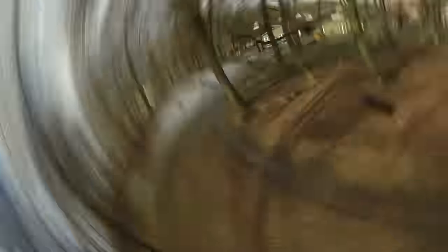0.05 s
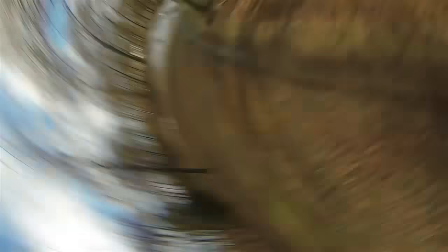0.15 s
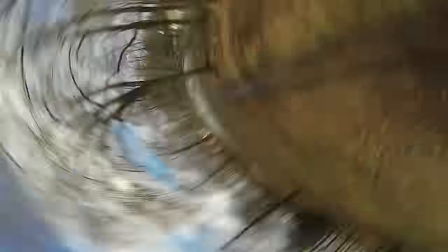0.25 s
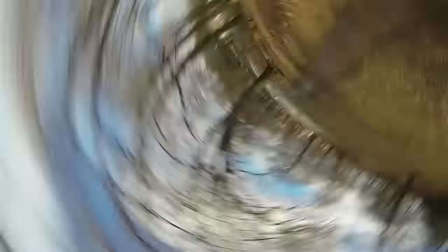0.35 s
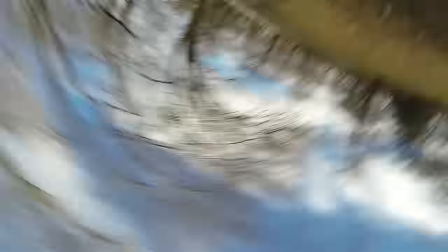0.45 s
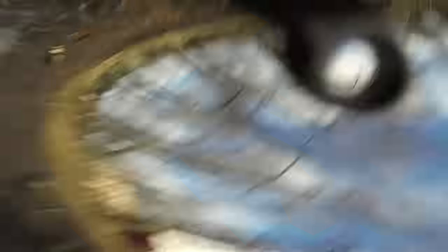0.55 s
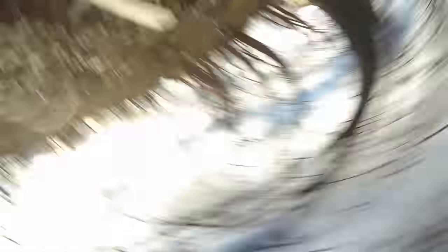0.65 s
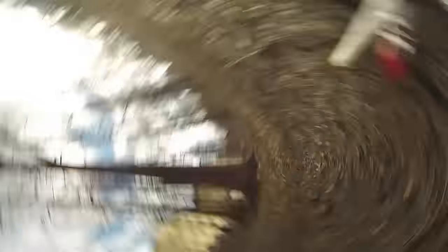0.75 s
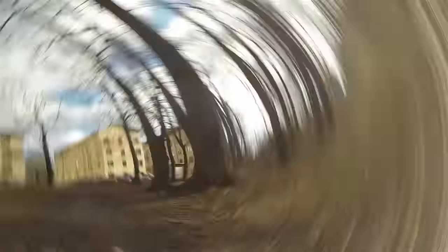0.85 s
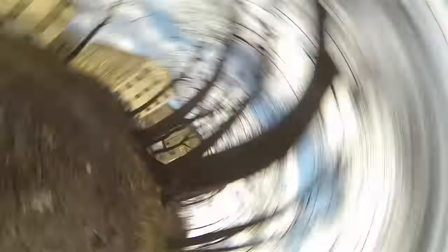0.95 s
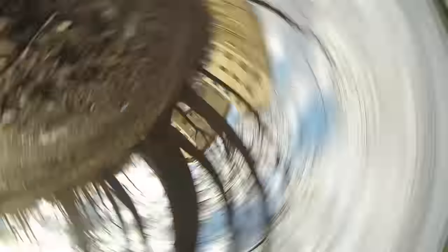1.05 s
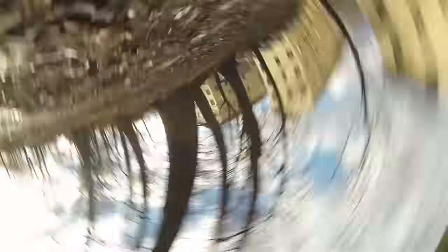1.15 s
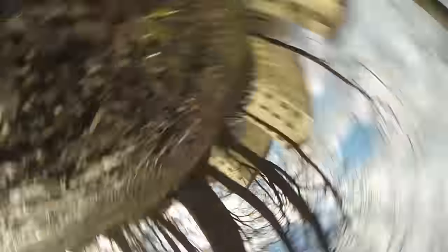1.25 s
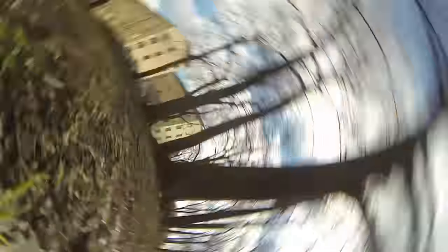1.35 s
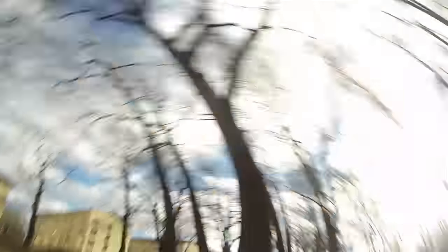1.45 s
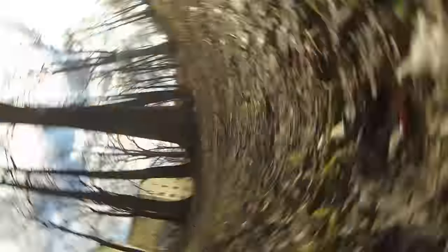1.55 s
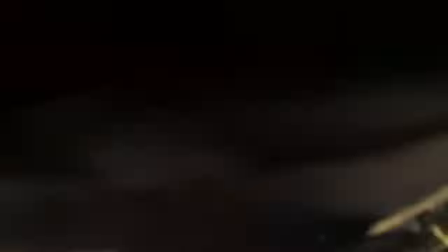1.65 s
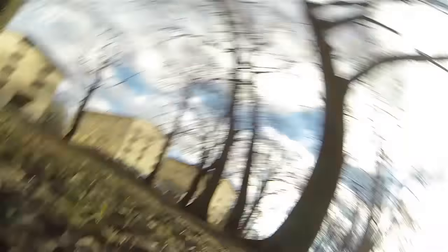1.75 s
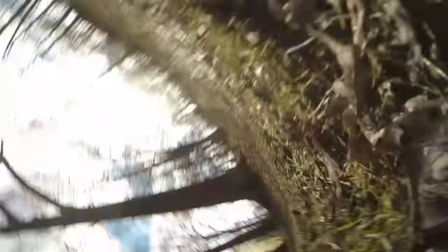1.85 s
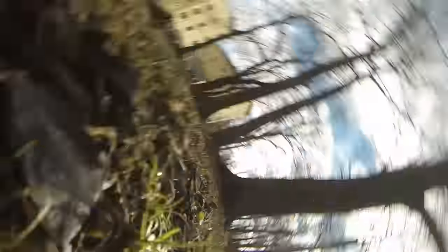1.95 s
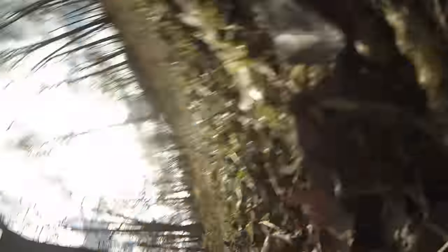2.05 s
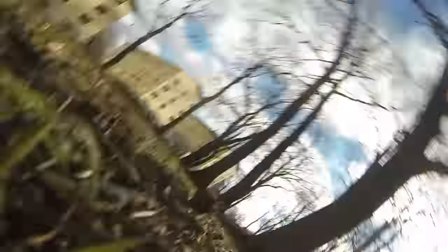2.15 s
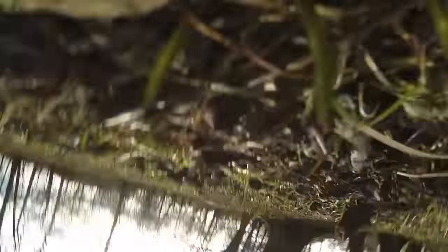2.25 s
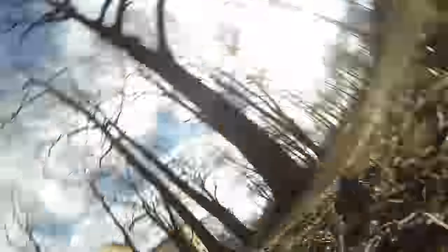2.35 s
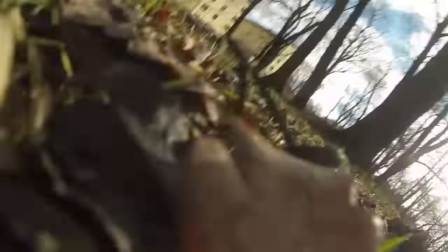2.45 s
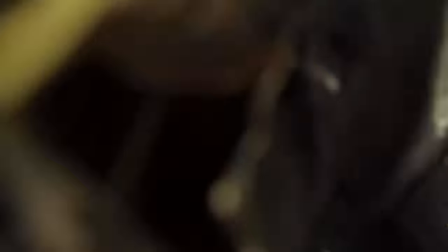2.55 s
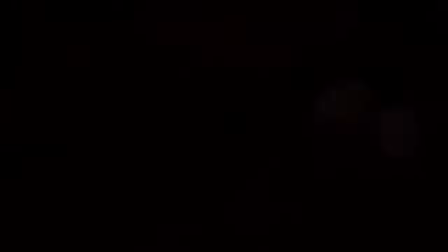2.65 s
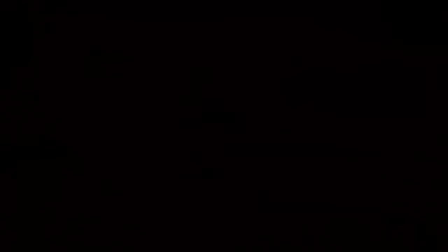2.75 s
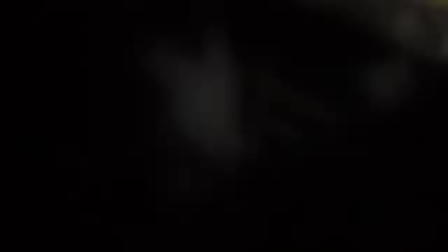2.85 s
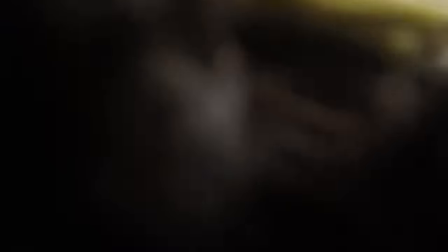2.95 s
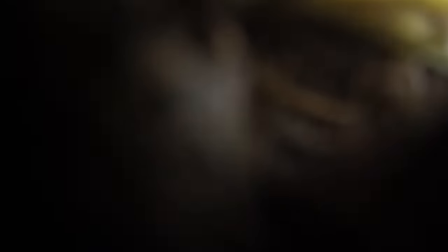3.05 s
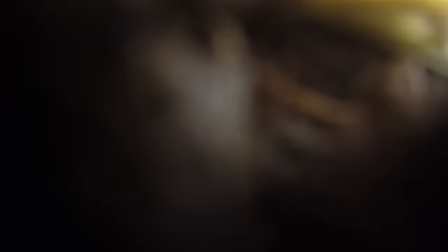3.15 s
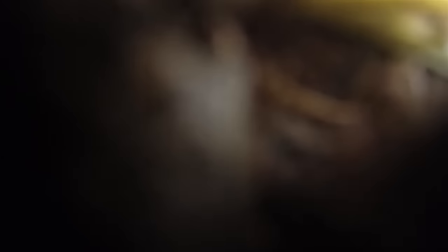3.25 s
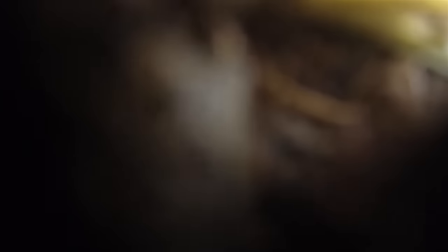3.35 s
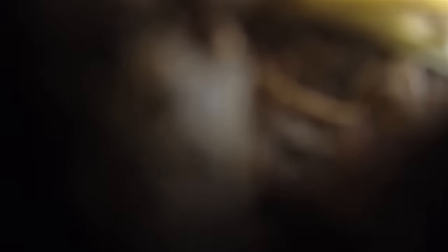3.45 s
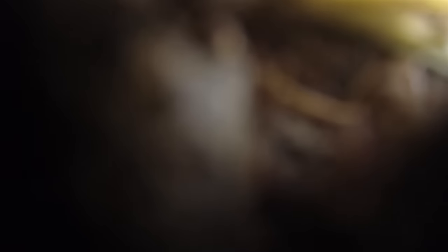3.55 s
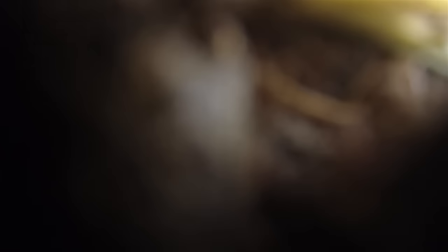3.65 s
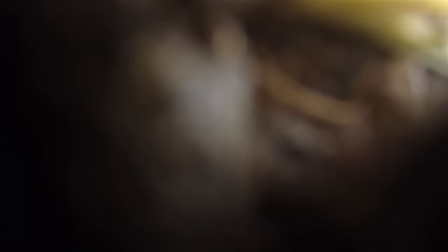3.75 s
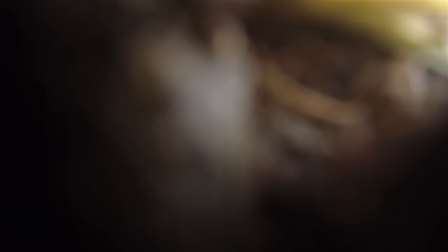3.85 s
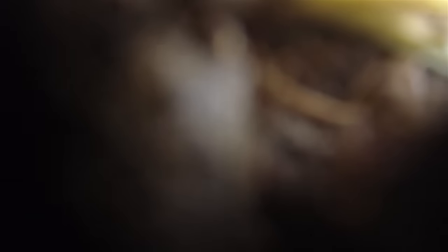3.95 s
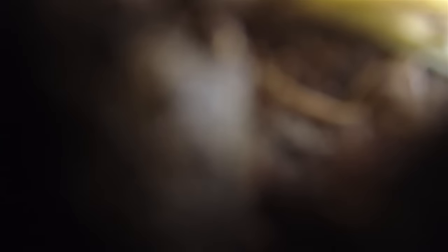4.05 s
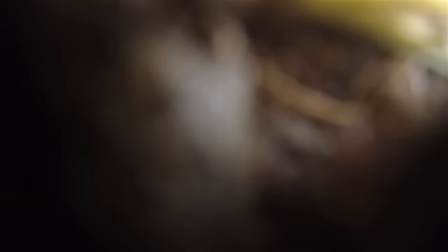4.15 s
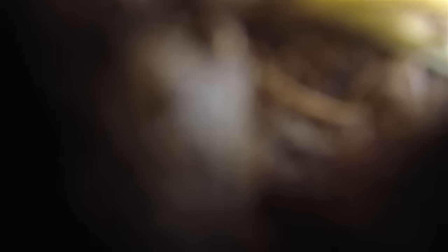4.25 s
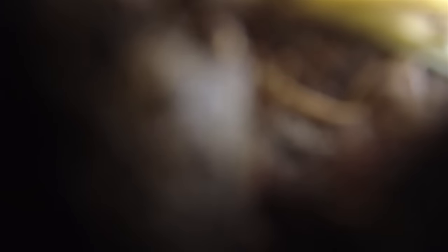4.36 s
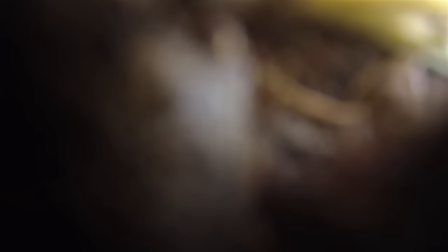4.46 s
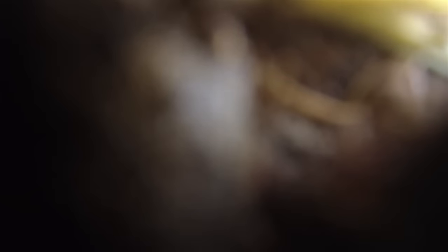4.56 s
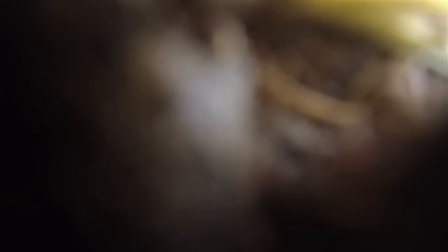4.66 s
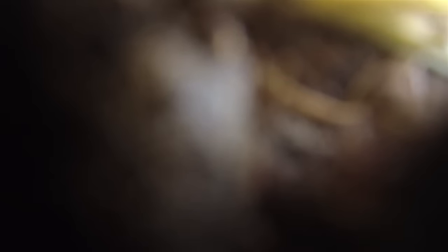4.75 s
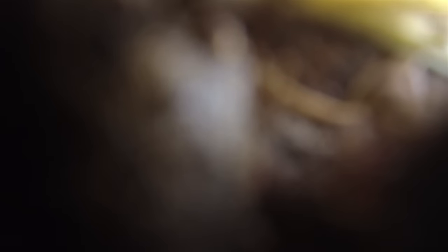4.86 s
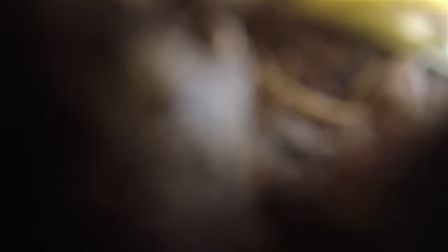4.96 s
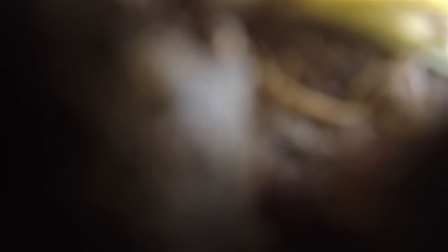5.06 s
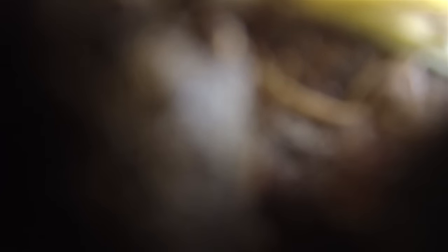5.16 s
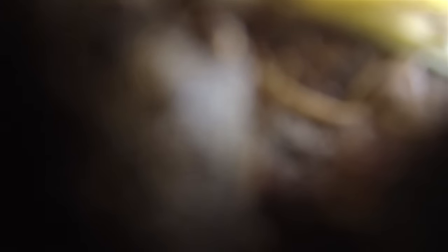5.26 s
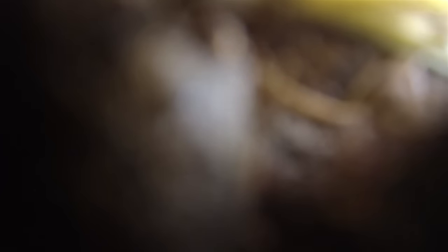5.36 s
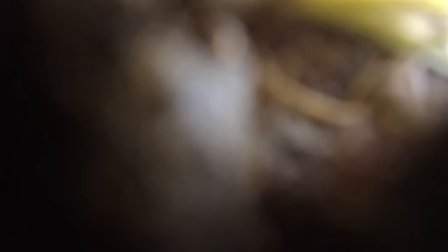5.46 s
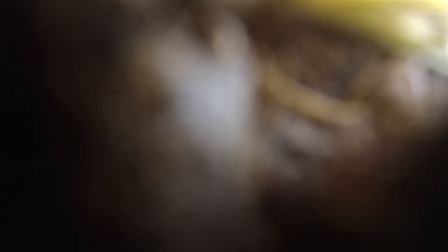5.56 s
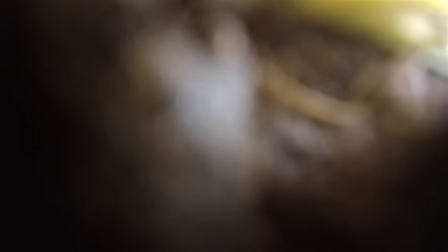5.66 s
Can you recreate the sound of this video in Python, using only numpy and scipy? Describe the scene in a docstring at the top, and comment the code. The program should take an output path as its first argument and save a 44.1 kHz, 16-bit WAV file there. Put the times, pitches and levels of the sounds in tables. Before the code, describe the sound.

Rapid whooshing wind blasts, then hard plastic clacks and cracks as a small drone tumbles through branches and lands, leaving faint traffic and birds.

```python
"""A small camera drone, motors stopped, falls through branches, heard from its own microphone.
First it spins fast: each turn brings a blast of air and its wake, made of filtered noise. A branch stops it.
Then it tumbles: short ringing blows, quickening rattles, dull gusts, and twigs that scrape in tiny clicks.
Once the loud blows end, distant traffic, made of noise and hums, becomes audible; then two birds whistle
in the trees, one high and one lower. A thin electronic whine runs throughout."""
import sys
import numpy as np
from scipy import signal
from scipy.fft import rfft, irfft
from scipy.io import wavfile
from scipy.ndimage import uniform_filter1d

SR = 44100
rng = np.random.default_rng(int(sys.argv[2]) if len(sys.argv) > 2 else 0)


def master_out(mix):
    """Clip the mix to full scale and print it as 16-bit PCM to the path in sys.argv[1]."""
    frames = np.transpose(np.atleast_2d(mix))
    ceiling = np.clip(frames, -1, 1)
    pcm = np.round(ceiling * 32767).astype(np.int16)
    wavfile.write(sys.argv[1], SR, pcm)


N = 251370
TIME = np.arange(N) / SR  # s
TOP_HZ = 15600  # upper limit of the microphone sound
CAUGHT_S = 0.588  # a branch stops the fast spin
LANDED_S, GROUND_CLACK_DB = 1.9, 2  # on the ground the frame clacks more than against branches
REST_S, SETTLE_DB_PER_S = 3.7, 4.5  # once the drone lies still, air and debris die away


def undb(db):
    """Turn decibels into a gain."""
    return 10 ** (np.asarray(db) / 20)


def level(x, db, seconds=None):
    """Scale to an rms level, as if all the energy lay within the given time."""
    count = len(x) if seconds is None else seconds * SR
    rms = np.sqrt(np.sum(x ** 2) / count + 1e-30)
    return x * undb(db) / rms


def curve(rows):
    """Join (time [s], value) rows by straight lines."""
    return np.interp(TIME, *np.transpose(rows))


def add(out, x, start):
    """Mix x into out from a time in seconds."""
    i = int(round(start * SR))
    first, last = max(i, 0), min(i + len(x), len(out))
    out[first:last] += x[first - i:last - i]


def centred(x, middle):
    """Make a full-length track that holds x with its middle at a time in seconds."""
    out = np.zeros(N)
    add(out, x, middle - len(x) / SR / 2)
    return out


def colour(x, points):
    """Filter by a spectrum of (frequency [Hz], level [dB]) points."""
    hz, db = np.transpose(points)
    f = np.maximum(np.fft.rfftfreq(len(x), 1 / SR), 1)
    gain = undb(np.interp(np.log(f), np.log(hz), db))
    return irfft(rfft(x) * gain, len(x))


def band(x, lo_hz, hi_hz, order=3):
    """Keep one band of frequencies."""
    sos = signal.butter(order, [lo_hz, min(hi_hz, .45 * SR)], "band", fs=SR, output="sos")
    return signal.sosfilt(sos, x)


def walk(rate):
    """Drift smoothly at random, with about so many new values a second."""
    k = int(SR / rate)
    steps = np.repeat(rng.standard_normal(N // k + 1), k)
    return uniform_filter1d(steps, k)[:N]


def grains(count, spread_db, rate, largest=4):
    """Scatter random clicks, about so many a second; a positive spread makes a few much larger."""
    size = undb(spread_db * np.minimum(rng.exponential(size=count), largest))
    happens = rng.random(count) < rate / SR
    return rng.standard_normal(count) * size * happens


def ring(modes, t, scatter, scatter_db):
    """Sum dying tones; where the blow lands shifts the pitch and strength of each."""
    out = np.zeros(len(t))
    for hz, t60, db in modes:
        strength, shift = rng.standard_normal(2)
        fade = np.exp(-np.log(1000) * t / t60)
        tone = np.sin(2 * np.pi * hz * (1 + scatter * shift) * t)
        out += undb(db + scatter_db * strength) * fade * tone
    return out


# blows on the frame: (time [s], pitch of the housing [Hz], knock level [dB], hardness [dB])
BLOWS = [(0.6184, 860, -29, 5.5), (0.6336, 696, -27, 2.5), (0.7582, 744, -14.5, 2),
         (0.7755, 930, -33.5, 10), (.809, 762, -14.5, -2), (1.074, 550, -47, 16.5),
         (1.118, 1060, -27.5, -5), (1.1418, 937, -19.5, 6.5), (1.3262, 950, -42.5, 10),
         (1.4504, 550, -34, -6), (1.6289, 890, -14, -7.5), (1.6821, 752, -14.5, -2.5),
         (1.6994, 590, -29.5, 2), (1.7404, 860, -18, 5), (1.826, 777, -16.5, 4.5), (1.957, 780, -17, 0.5),
         (2.0508, 740, -26.5, -1), (2.079, 702, -24.5, 0), (2.2089, 723, -17, 0.5),
         (2.3527, 768, -16.5, 7.5), (2.445, 793, -17, -0.5), (2.5423, 693, -16.5, -3.5),
         (2.7224, 775, -17.5, 1.5), (2.835, 836, -24, -3.5), (2.9138, 595, -49.5, 6),
         (3.045, 860, -43.5, 6), (3.223, 722, -53.5, -4), (3.3775, 780, -53.5, -1),
         (3.4797, 640, -53.5, 12), (3.537, 603, -54.5, 2), (4.0202, 905, -44.5, -9), (4.3496, 640, -61, 7)]


def blows():
    """The frame strikes branches and ground, then shifts a few times where it lies."""
    out = np.zeros(N)
    for start, hz, knock_db, hardness_db in BLOWS:
        add(out, blow(hz, knock_db, hardness_db, start > LANDED_S), start)
    return out


# the heavily damped camera housing: (multiple of its pitch [x], time to fade by 60 dB [s], level [dB])
HOUSING = [(1, 0.021, -5), (1.2, 0.018, -5.5), (2.42, 0.0039, -11), (3.3, 0.0089, -21), (3.6, 0.0027, -30),
           (6.75, 0.0042, -11), (9.7, 0.0067, -16.5), (13.5, .003, -10), (16.3, .0025, -12.5)]
# the arms and propellers ring on: (frequency [Hz], time to fade by 60 dB [s], level [dB])
FRAME = [(286, 0.1, -30), (505, 0.27, -40), (863, 0.059, -19), (1050, 0.088, -35), (1210, 0.089, -30),
         (1333, 0.11, -31.5), (2050, 0.018, -26), (2400, 0.032, -33.5)]
# colour of splintering wood, also of ticking debris: (frequency [Hz], level [dB])
SPLINTER = [(250, 4), (800, 9.5), (2700, -7), (3500, -3), (4000, 4), (5200, -7.5), (6500, -4), (7700, -3),
            (10800, -8.5), (12800, -17.5), (14000, -16), (15500, -19.5)]
# clack and snap relative to the knock; hardness adds fully to the snap and partly to the clack
CLACK_DB, SNAP_DB, CLACK_SHARE = -6.5, -15, 0.36


def blow(hz, knock_db, hardness_db, on_ground, contact_s=0.0015, splinter_db=-6, after_db=-21,
         after_s=0.0077, ring_db=0.0, knock_s=0.0084, clack_s=0.0081, snap_s=0.013):
    """A blow knocks the housing, splinters wood for a millisecond or so and leaves the frame ringing."""
    t = np.arange(SR // 4) / SR
    housing_modes = [(hz * ratio, t60, db) for ratio, t60, db in HOUSING]
    housing = ring(housing_modes, t, scatter=0.044, scatter_db=2.5)
    frame = undb(ring_db) * ring(FRAME, t, scatter=0.05, scatter_db=3.0)
    cracks = colour(grains(len(t), spread_db=0.0, rate=28000), SPLINTER)
    fracture = level(cracks, splinter_db) * np.exp(-t / contact_s)
    # single fibres keep snapping just after the break
    late_cracks = colour(grains(len(t), spread_db=-3.5, rate=1400), SPLINTER)
    fibres = level(late_cracks, splinter_db + after_db) * np.exp(-t / after_s)
    hit = fracture + fibres - housing - frame
    # harder contacts hold more clack and snap
    clack_db = knock_db + CLACK_DB + CLACK_SHARE * hardness_db + GROUND_CLACK_DB * on_ground
    knock = level(band(hit, 200, 1200, order=2), knock_db, knock_s)
    clack = level(band(hit, 1647, 3110, order=4), clack_db, clack_s)
    snap = level(band(hit, 4200, TOP_HZ), knock_db + SNAP_DB + hardness_db, snap_s)
    return knock + clack + snap


# the frame chatters after a blow: (time of the blow [s], first gap [s], quickening [power],
# rebounds [count], first rebound level [dB], hardness [dB], buzz level [dB])
RATTLES = [(0.808, .0264, .6, 7, -22.5, -0.5, -51), (1.1404, .0342, 1.15, 4, -38, -5, -72),
           (1.826, .0293, .95, 3, -31.5, -1.5, -61.5), (2.835, .0323, 1.01, 3, -32.5, -14, -59)]
REBOUND_HZ, REBOUND_SAG_HZ, REBOUND_LOSS_DB = 826, 28.4, 2  # first rebound; each next is lower and weaker
BUZZ_CRACKLE_DB = -11.5  # crackle relative to the buzz, before hardness is added


def rattles(buzz_middle=.6, buzz_length=0.57):
    """Rebounds come ever faster, weaker and lower, over a buzz of loose parts."""
    out = np.zeros(N)
    for start, gap, quickening, count, db, hardness_db, buzz_db in RATTLES:
        delays = np.cumsum(gap / np.arange(1, round(count) + 1) ** quickening)
        for k, delay in enumerate(delays):
            hz = REBOUND_HZ - k * REBOUND_SAG_HZ
            rebound = blow(hz, db - k * REBOUND_LOSS_DB, hardness_db, start > LANDED_S)
            add(out, rebound, start + delay)
        buzz = scrape(buzz_length * delays[-1], buzz_db, buzz_db + BUZZ_CRACKLE_DB + hardness_db)
        out += centred(buzz, start + buzz_middle * delays[-1])
    return out


# once a turn the port faces the airflow:
# (time [s], length of the blast [s], hiss level of the blast [dB], hiss level of its wake [dB])
TURNS = [(-.018, 0.012, -32, -30.5), (.077, 0.028, -19.5, -28), (.164, 0.011, -17, -26.5),
         (.257, 0.009, -14, -24), (.351, .024, -15.5, -20.5), (.445, 0.012, -15.5, -21.5),
         (.536, 0.011, -16.5, -19.5)]
# the wake of the arms follows each blast: (delay [share of a turn], length [s], thump level [dB],
# flutter level halfway through the spin [dB], hiss relative to the turn's wake [dB])
WAKE = [(0.329, 0.023, -15, -20, -1), (.59, 0.015, -20, -19.5, -2.5)]
SPIN_HZ = 10.85  # turns a second
BLAST_THUMP_DB, BLAST_FLUTTER_DB = -16, -19  # flutter level is that halfway through the spin


def spin(flutter_db_per_s=6):
    """Every turn brings a blast and its wake; flutter grows as the fall gathers speed, until the catch."""
    out = np.zeros(N)
    for facing, blast_s, blast_hiss_db, wake_hiss_db in TURNS:
        speed_db = flutter_db_per_s * (facing - CAUGHT_S / 2)
        blast = gust(blast_s, BLAST_THUMP_DB, BLAST_FLUTTER_DB + speed_db, blast_hiss_db)
        out += centred(blast, facing)
        for share, length, thump_db, flutter_db, hiss_db in WAKE:
            wake = gust(length, thump_db, flutter_db + speed_db, wake_hiss_db + hiss_db)
            out += centred(wake, facing + share / SPIN_HZ)
    return out * spinning()


def spinning(brake_s=0.0073):
    """One while the drone spins fast, zero once it is caught."""
    return .5 - .5 * np.tanh((TIME - CAUGHT_S) / brake_s)


# single gusts of the slower tumble: (time [s], length [s], thump level [dB], flutter level [dB])
GUSTS = [(0.646, 0.017, -20.5, -25.5), (0.665, 0.0097, -27, -23), (0.722, 0.036, -22, -42),
         (0.748, 0.0061, -15.5, -12.5), (0.916, 0.012, -18, -24.5), (0.997, 0.0023, -12, -11),
         (1.001, 0.0083, -17, -26), (1.084, .0046, -27, -13.5), (1.087, 0.015, -21, -27),
         (1.276, 0.021, -22, -30), (1.351, 0.02, -20, -27), (1.38, 0.02, -19.5, -23.5),
         (1.499, 0.018, -16.5, -24), (1.535, 0.017, -24.5, -22.5), (1.65, 0.017, -16, -17.5),
         (1.706, 0.011, -15.5, -20.5), (2.084, 0.0075, -16, -45), (2.187, 0.012, -30, -52),
         (2.219, .014, -29, -60), (2.337, 0.019, -26, -52), (2.654, 0.027, -28, -33.5)]
SLOW_HISS_DB = -28  # hiss of a slow gust, relative to its flutter


def gusts():
    """Tumbling more slowly, the port meets the air in single dull gusts."""
    out = np.zeros(N)
    for middle, length, thump_db, flutter_db in GUSTS:
        out += centred(gust(length, thump_db, flutter_db, flutter_db + SLOW_HISS_DB), middle)
    return out


# colours of the three parts of a gust: (frequency [Hz], level [dB])
THUMP = [(12, -13.5), (30, 3), (100, -1.5), (150, -8), (280, -29.5), (800, -88)]
FLUTTER = [(70, -18.5), (170, -1.5), (350, -1.5), (650, -9.5), (1000, -19), (1900, -41.5), (5000, -79.5)]
HISS = [(350, -15), (700, 3), (1000, 2), (1600, -1.5), (2700, -8.5), (4500, -17), (7000, -28.5),
        (12000, -39.5), (16000, -51.5)]


def gust(length, thump_db, flutter_db, hiss_db, spread=0.51, hiss_spread=0.26,
         core_db=-6.5, core_s=0.0088, usual_s=0.011, sharpening=0.43):
    """As the port swings into the airflow, eddies thump, flutter and break up into hiss."""
    t = np.arange(-4096, 4096) / SR
    # a brief gust is mostly one vortex core: a sharp dip of pressure
    core = -undb(core_db) * (core_s / length) ** 2 * (t == 0)
    swirl = grains(len(t), spread_db=3.5, rate=1600) * np.exp(-.5 * (t / (spread * length)) ** 2)
    eddies = core + level(swirl, 0, 1 / SR)  # swirl of unit energy
    # the faster it passes, the higher its flutter reaches
    stretch = max(usual_s / length, 1) ** sharpening
    flutter_colour = [(hz * stretch, db) for hz, db in FLUTTER]
    spray = grains(len(t), spread_db=7, rate=12000) * np.exp(-.5 * (t / (hiss_spread * length)) ** 2)
    thump = level(colour(eddies, THUMP), thump_db, length)
    flutter = level(colour(eddies, flutter_colour), flutter_db, length)
    hiss = level(colour(spray, HISS), hiss_db, length)
    return thump + flutter + hiss


# twigs and dry leaves brushing past: (time [s], length [s], rasp level [dB], crackle level [dB])
SCRAPES = [(0.565, 0.0019, -15.5, -16), (0.574, 0.0084, -18.5, -27.5), (0.635, 0.019, -36, -42),
           (0.688, .016, -25.5, -39), (0.714, 0.035, -43, -51.5), (0.765, 0.005, -37.5, -42),
           (0.822, 0.0077, -52, -51), (1.127, 0.0083, -30.5, -39), (1.143, 0.0056, -33, -22.5),
           (1.347, 0.0043, -29.5, -35.5), (1.367, 0.024, -40.5, -59), (1.483, 0.028, -56, -61.5),
           (1.626, 0.0047, -36, -54), (1.706, 0.0078, -31, -41), (1.9, 0.048, -48.5, -57),
           (2.101, 0.038, -50, -61), (2.305, 0.0067, -46.5, -43.5), (2.324, 0.023, -42, -39),
           (2.651, 0.029, -38, -37.5), (2.682, 0.031, -47, -52.5), (2.804, .037, -54.5, -57),
           (4.058, 0.086, -69, -67), (4.298, 0.51, -71.5, -74.5), (5.471, .1, -55.5, -78),
           (5.616, 0.19, -61, -93)]


def scrapes():
    """Twigs and leaves slide along the frame."""
    out = np.zeros(N)
    for middle, length, rasp_db, crackle_db in SCRAPES:
        out += centred(scrape(length, rasp_db, crackle_db), middle)
    return out


# colours of the two parts of a scrape: (frequency [Hz], level [dB])
RASP = [(300, -9.5), (900, 4.5), (2700, -1), (4500, -8.5), (7000, -40), (14000, -48)]
CRACKLE = [(2500, -27), (5500, -2), (7800, -3.5), (10000, -9.5), (12500, -8), (15500, -21.5)]


def scrape(length, rasp_db, crackle_db, spread=0.44, grain_db=5.0, slide_s=.1):
    """A contact catches and slips in a shower of tiny clicks; long slides are smoother."""
    t = np.arange(-16384, 16384) / SR
    swell = np.exp(-.5 * (t / (spread * length)) ** 2)
    clicks = grains(len(t), spread_db=grain_db / (1 + length / slide_s), rate=5900) * swell
    rasp = level(colour(clicks, RASP), rasp_db, length)
    crackle = level(colour(clicks, CRACKLE), crackle_db, length)
    return rasp + crackle


# slow air pressure on the tumbling body, before the tumble gain: (time [s], level [dB])
DRAUGHT = [(0.6, -32.5), (0.7, -33), (1.22, -40), (1.54, -33.5), (1.71, -38.5), (2.06, -38), (3.1, -52.5)]
# colour of the slow air: (frequency [Hz], level [dB])
SWAY = [(10, -10.5), (28, 3.5), (60, -2), (120, -11.5), (250, -19), (600, -29.5), (2000, -43), (8000, -74)]
SPIN_DRAUGHT_DB, TUMBLE_DRAUGHT_DB = -17, -1  # strength during the spin; gain on the tumble curve


def draught():
    """The air heaves slowly against the tumbling body, most of all during the spin."""
    tumble = undb(curve(DRAUGHT) + TUMBLE_DRAUGHT_DB + settling_db())
    strength = undb(SPIN_DRAUGHT_DB) * spinning() + tumble
    air = level(colour(rng.standard_normal(N), SWAY), -1.4)
    return air * strength * undb(1.8 * walk(24))


def settling_db():
    """The steady fade after the drone has come to rest."""
    return -SETTLE_DB_PER_S * np.maximum(TIME - REST_S, 0)


# how much loose debris is stirred, before the fade at rest: (time [s], level [dB])
STIR = [(0.9, -56.5), (1.16, -72), (1.85, -57), (2.11, -68.5), (2.71, -51), (2.98, -68.5), (3.1, -70.5)]


def litter():
    """Fine debris ticks against the drone and dies away once it lies still."""
    ticks = level(colour(grains(N, spread_db=4.5, rate=2000), SPLINTER), -0.54)
    return ticks * undb(curve(STIR) + settling_db() + 1.3 * walk(66))


# colour of distant traffic: (frequency [Hz], level [dB])
TRAFFIC = [(15, -39.5), (25, -3.5), (59, 0.5), (172, -7), (224, -9), (404, -13), (573, -16.5), (673, -15),
           (833, -18.5), (1000, -19), (2850, -38.5), (8100, -54), (9020, -51), (13800, -62.5), (15000, -64)]
# how loud the traffic is heard, audible once the loud blows end: (time [s], level [dB])
TRAFFIC_DB = [(0, -92), (2.95, -50), (3.1, -51), (3.3, -45), (3.55, -41.5), (3.9, -40), (4.3, -42),
              (4.9, -40.5), (5.7, -39.5)]
# far engines hum in narrow bands:
# (frequency [Hz], width [Hz], level at the loudest [dB], time of the loudest [s], swell time [s])
DRONES = [(665.5, 40, -54.5, 4.48, 0.9), (723, 60, -52.5, 6.2, 1.2), (930, 200, -60.5, 4.96, 1.5),
          (413.5, 19, -51, 5.41, 0.49), (1237, 58, -57.5, 5.94, 0.44), (142.4, 53, -50, 3.9, 0.33)]


def traffic():
    """A far road: wavering rumble, and engine hums that swell and fade."""
    rumble = level(colour(rng.standard_normal(N), TRAFFIC), -1.4)
    out = rumble * undb(curve(TRAFFIC_DB) + 0.97 * walk(7))
    for hz, width, db, middle, swell in DRONES:
        hum = level(band(rng.standard_normal(N), hz - width / 2, hz + width / 2, order=2), db)
        out += hum * np.exp(-.5 * ((TIME - middle) / swell) ** 2)
    return out


# notes of two birds, one high and one lower:
# (time [s], length [s], closing pitch [Hz], level before the trees [dB])
NOTES = [(3.764, 0.22, 8020, -70), (3.85, .08, 4520, -67), (4.027, 0.12, 7860, -64),
         (4.13, 0.11, 4530, -67), (4.245, .1, 8000, -68), (4.425, .06, 7840, -67), (4.437, 0.11, 4490, -71),
         (5.17, .1, 4240, -71.5), (5.302, 0.17, 4170, -69), (5.5, .19, 4220, -72)]
FALL_SHARE, FALL_AT_HZ, FALL_POWER = .046, 8000, 1.6  # each note falls onto its pitch, high ones further


def birds(echo_db=-7, echo_s=0.097):
    """Thin falling whistles of two birds, smeared by the trees."""
    song = np.zeros(N)
    for start, length, last_hz, db in NOTES:
        u = np.linspace(0, 1, int(length * SR))  # progress through the note
        fall = FALL_SHARE * (last_hz / FALL_AT_HZ) ** FALL_POWER
        waver = 1 + 0.0025 * walk(201)[:len(u)]
        hz = last_hz * (1 + fall * (1 - u) ** 2) * waver
        whistle = np.sin(2 * np.pi * np.cumsum(hz) / SR) * np.sqrt(u * (1 - u))
        add(song, level(whistle, db), start)
    trees = level(rng.standard_normal(SR) * np.exp(-TIME[:SR] / echo_s), echo_db, 1 / SR)
    return undb(-5.5) * song + signal.fftconvolve(song, trees)[:N]


WHINE_HZ, WHINE_DB = 13900, -83  # middle pitch, peak level


def whine():
    """The electronics whine faintly, a high tone of slightly wavering pitch."""
    hz = WHINE_HZ * (1 + .004 * walk(500))
    return undb(WHINE_DB) * np.sin(2 * np.pi * np.cumsum(hz) / SR)


def scene():
    """Everything reaches the one microphone on the drone."""
    contact = blows() + rattles() + scrapes() + litter()
    air = spin() + gusts() + draught()
    background = traffic() + birds() + whine()
    return (contact + air + background)[None]


def record(dry):
    """The camera rounds peaks near full scale and cuts the top."""
    rounded = dry / (1 + (dry / .95) ** 6) ** (1 / 6)
    return signal.sosfilt(signal.ellip(8, .2, 70, TOP_HZ, fs=SR, output="sos"), rounded)


dry = scene()
out = record(dry)
master_out(out)
```